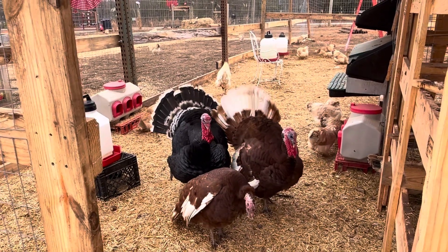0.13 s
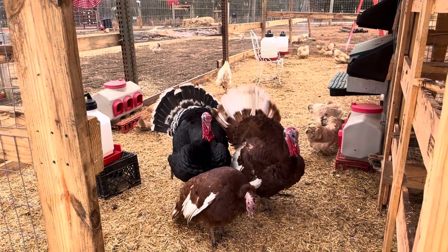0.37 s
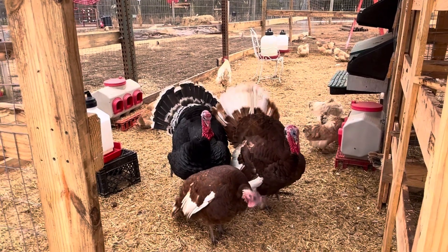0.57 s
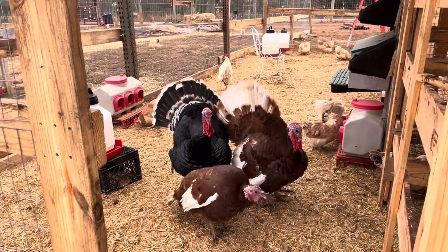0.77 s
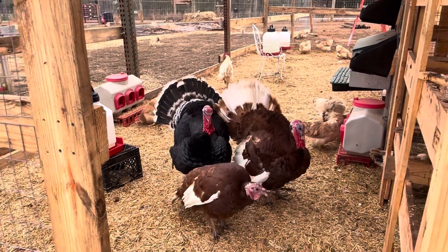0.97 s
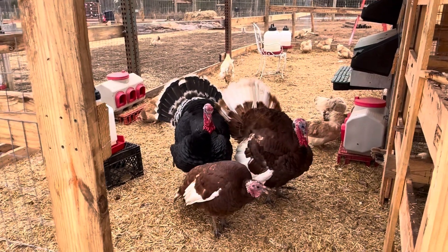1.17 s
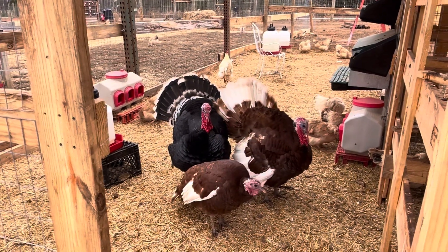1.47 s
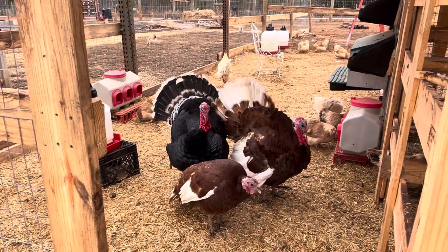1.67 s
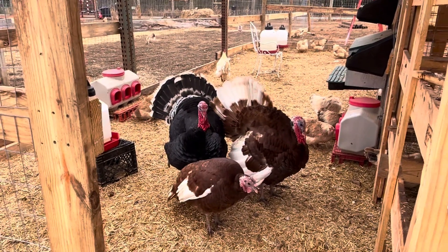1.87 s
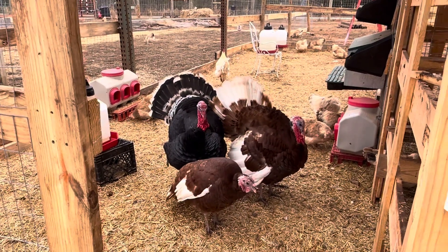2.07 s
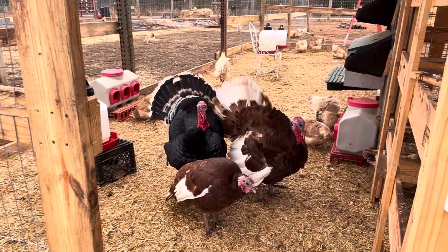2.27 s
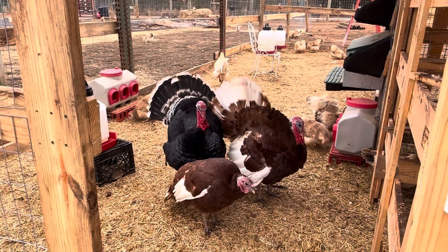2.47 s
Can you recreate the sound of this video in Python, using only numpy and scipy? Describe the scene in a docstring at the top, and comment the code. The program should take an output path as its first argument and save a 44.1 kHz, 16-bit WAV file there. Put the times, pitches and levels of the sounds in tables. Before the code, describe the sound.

Turkey feathers flutter and thump quickly, with airy puffs and rustling, over low outdoor rumble

```python
"""Wingbeats in a roofed pen

A bird beats its wings about ten times a second in a farmyard pen. Each beat thumps, ringing low hollow resonances;
air whooshes as band noise and feathers rustle as grainy bursts. Dry scratches snap in the litter, the flock stirs and
faint cheeps waver, over filtered-noise rumble and hiss. A phone with two spaced microphone ports hears it,
the left port a little later.
"""
import sys
import numpy as np
from scipy import signal
from scipy.fft import rfft, irfft
from scipy.io import wavfile
from scipy.ndimage import uniform_filter1d, map_coordinates

SR = 44100
rng = np.random.default_rng(int(sys.argv[2]) if len(sys.argv) > 2 else 0)


def gain_from_db(level_db):
    """Convert decibel levels to linear amplitude factors (20 dB per decade)."""
    decades = np.asarray(level_db, float) / 20
    return 10 ** decades


def output_pcm(signal):
    """Save a mono or channel-first signal as 16-bit PCM at the path in sys.argv[1].

    Samples are clipped to [-1, 1] before scaling.
    """
    pcm = np.clip(np.atleast_2d(signal).T, -1, 1) * 32767
    wavfile.write(sys.argv[1], SR, np.round(pcm).astype(np.int16))


N = 115101
T = np.arange(N) / SR


def col(table, k, at, log=False):
    """Column k of a table, joined by straight lines over its first column or the log of it."""
    a = np.array(table, float)
    if log:
        return np.interp(np.log(at + 1e-3), np.log(a[:, 0]), a[:, k])
    return np.interp(at, a[:, 0], a[:, k])


def unit(x):
    """Scale to rms 1."""
    return x / np.sqrt(np.mean(x ** 2))


def colour(x, points):
    """Filter by (freq_hz, gain_db) points, silent outside them."""
    hz = np.fft.rfftfreq(len(x), 1 / SR)
    inside = (hz > points[0][0]) & (hz < points[-1][0])
    gain = gain_from_db(col(points, 1, hz, log=True)) * inside
    return irfft(rfft(x) * gain, len(x))


def bell(hz, centre_hz, octaves):
    """Gaussian over log frequency, octaves being its standard deviation."""
    return np.exp(-.5 * (np.log2(hz / centre_hz) / octaves) ** 2)


def hump(x, centre_hz, octaves):
    """Bell-shaped band around centre_hz."""
    hz = np.fft.rfftfreq(len(x), 1 / SR) + 1
    return irfft(rfft(x) * bell(hz, centre_hz, octaves), len(x))


def walk(rate_hz):
    """Random levels held 1 / rate_hz seconds and smoothed twice."""
    k = int(SR / rate_hz)
    held = np.repeat(rng.standard_normal(N // k + 1), k)
    return 1.206 * uniform_filter1d(uniform_filter1d(held, k), k)[:N]


def burst(t, length_s, rise=0.35):
    """Envelope from t = 0: peaks at 1 after rise * length_s, then falls more slowly."""
    u = np.maximum(t, 0) / (rise * max(length_s, .002))
    return u * np.exp(1 - u)


def ringing(t, hz, t60_s):
    """Exponential decay of a resonance, as a complex tone falling 60 dB in t60_s."""
    return np.exp(2j * np.pi * hz * t - np.log(1000) * t / t60_s)


def crackle():
    """Noise with sparse grains of uneven size on top."""
    grains_per_s, spread_db = 3500, 2
    size = gain_from_db(spread_db * rng.exponential(size=N))
    grains = (rng.random(N) < grains_per_s / SR) * size
    return unit(grains * rng.standard_normal(N)) + 1.08 * rng.standard_normal(N)


# wing thumps: start_s, peak_db (before trim_db), centre_hz, flutter_re_push_db
WING_THUMPS = [(0.106, -52, 177, -2), (0.267, -51, 213, 0), (0.323, -40.5, 222, -10),
               (0.566, -45.5, 206, -4), (0.643, -38.5, 260, -7.5), (0.699, -57.5, 296, -10),
               (0.777, -35.5, 286, -6.5), (0.861, -40, 237, 2), (0.871, -46, 234, -16),
               (0.944, -42, 289, 3), (0.957, -42.5, 242, 3), (0.989, -37, 205, -26), (1.057, -34, 226, -3),
               (1.095, -55, 256, -6), (1.135, -43, 219, 0), (1.167, -34.5, 298, -2.5),
               (1.278, -33.5, 202, -3), (1.347, -40.5, 326, -4), (1.385, -36.5, 248, 0),
               (1.409, -43, 236, 11), (1.472, -41, 331, 2), (1.488, -38.5, 238, -3),
               (1.554, -47.5, 324, -4), (1.598, -40.5, 335, -6), (1.619, -47, 332, -18),
               (1.707, -43.5, 221, 5.5), (1.733, -48, 189, -18), (1.775, -42.5, 220, -2),
               (1.799, -41.5, 408, 2), (1.998, -49, 128, -4), (2.027, -42.5, 282, 3.5),
               (2.128, -36.5, 304, -2.5), (2.3, -45, 202, -3.5), (2.335, -42.5, 199, -12),
               (2.404, -44, 172, -2)]
# hollow resonances: freq_hz, level_db, t60_s
HOLLOW_MODES = [(117, -3, 0.054), (142.5, -4, 0.037), (205, -2.5, 0.081), (250, 1, 0.029),
                (317.7, -7, 0.12), (426, -8.5, 0.068), (529.4, -16.5, 0.12)]


def thumps():
    """A soft push of air, then flutter, ring the hollow resonances."""
    push_s, flutter_s, flutter_octaves, trim_db = 0.0035, 0.032, 0.68, -1
    size = 16384
    out, t = np.zeros(N + size), np.arange(size) / SR
    ring = sum(gain_from_db(db) * ringing(t, hz, t60_s).real for hz, db, t60_s in HOLLOW_MODES)
    airs = rng.standard_normal((len(WING_THUMPS), size))
    for (start_s, db, hz, flutter_db), air in zip(WING_THUMPS, airs):
        push = burst(t, push_s, rise=0.77) * np.sin(2 * np.pi * hz * t)
        flutter = hump(air, hz, flutter_octaves) * burst(t, flutter_s)
        drive = unit(push) + gain_from_db(flutter_db) * unit(flutter)
        thump = signal.fftconvolve(drive, ring)[:size]
        i = int(start_s * SR)
        out[i:i + size] += thump / np.abs(thump).max() * gain_from_db(db + trim_db)
    return out[:N]


# air through the wing: start_s, level_db (before trim_db), centre_hz, length_s
WING_WHOOSHES = [(0.107, -55, 597, 0.023), (0.539, -54.5, 740, 0.045), (0.574, -53, 604, 0.017),
                 (0.648, -61, 613, 0.021), (0.78, -51, 566, 0.013), (0.783, -56, 1580, 0.02),
                 (0.85, -48, 850, 0.018), (0.871, -48.5, 710, 0.021), (0.977, -52, 844, 0.031),
                 (1.003, -48, 590, 0.018), (1.068, -50.5, 930, 0.0092), (1.15, -47, 570, 0.028),
                 (1.172, -51.5, 565, 0.02), (1.28, -54, 685, 0.025), (1.334, -48.5, 920, 0.034),
                 (1.391, -57, 940, 0.046), (1.474, -52, 603, 0.021), (1.554, -49.5, 1040, 0.015),
                 (1.619, -57.5, 740, 0.029), (1.729, -53.5, 850, 0.027), (1.788, -51, 920, 0.026),
                 (1.873, -57, 610, 0.045), (1.974, -59.5, 550, 0.05), (2.018, -50.5, 875, 0.012),
                 (2.071, -54, 940, 0.038), (2.131, -54.5, 650, 0.032), (2.167, -53.5, 895, 0.022),
                 (2.447, -57.5, 596, 0.034), (2.597, -49, 520, 0.025)]


def whooshes():
    """Air through the wing: short puffs of band noise."""
    width_octaves, trim_db = 0.56, -7
    size = 8192
    out, t = np.zeros(N + size), np.arange(size) / SR
    airs = rng.standard_normal((len(WING_WHOOSHES), size))
    for (start_s, db, hz, length_s), air in zip(WING_WHOOSHES, airs):
        puff = unit(hump(air, hz, width_octaves)) * burst(t, length_s, rise=0.62) ** 2
        i = int(start_s * SR)
        out[i:i + size] += puff * gain_from_db(db + trim_db)
    return out[:N]


# feather rustles: time_s, level_db (low band before low_trim_db), top_re_level_db, length_s
FEATHER_RUSTLES = [(0.073, -78.5, 4.5, 0.061), (0.123, -56.5, -13, 0.047), (0.333, -63, -10, 0.055),
                   (0.427, -68, -10, 0.058), (0.488, -62, -12, 0.04), (0.52, -66, -24, 0.05),
                   (0.568, -64, -27, 0.047), (0.628, -58.5, -18.5, 0.074), (0.675, -63.5, -14.5, 0.084),
                   (0.72, -66, -12.5, 0.067), (0.782, -51.5, -17.5, 0.056), (0.892, -60, -34, 0.022),
                   (0.974, -54.5, -9, 0.043), (1.017, -62, -27, 0.062), (1.08, -54, -14.5, 0.049),
                   (1.16, -62, -26, 0.033), (1.274, -54, -14, 0.07), (1.31, -58.5, -21, 0.052),
                   (1.398, -54.5, -16, 0.054), (1.433, -57, -19.5, 0.057), (1.4994, -59.5, -16, 0.046),
                   (1.62, -52.5, -13.5, 0.057), (1.716, -57, -17, 0.069), (1.79, -61.5, -15, 0.051),
                   (1.863, -68, -25, 0.036), (1.911, -58.5, -16.5, 0.07), (2.037, -62, -14, 0.045),
                   (2.135, -56, -17, 0.07), (2.272, -57, -15.5, 0.047), (2.502, -75, 0.5, 0.1)]
# low band spectrum: freq_hz, density_db (per Hz)
RUSTLE_LOW = [(1200, 3.5), (2000, -2), (3400, -0.5), (5000, -1.5), (7000, -2)]
# top band spectrum: freq_hz, density_db (per Hz)
RUSTLE_HIGH = [(7000, -4), (9000, -3), (12000, -3.5), (14000, -7), (15000, -11), (16000, -27)]


def rustles():
    """Feathers rub in grainy bursts, each with its own brightness; the top band starts 3 ms sooner."""
    low_trim_db = -9.5
    low, top = np.zeros(N), np.zeros(N)
    for time_s, db, top_db, length_s in FEATHER_RUSTLES:
        low += gain_from_db(db + low_trim_db) * burst(T - time_s + 0.01, length_s)
        top += gain_from_db(db + top_db) * burst(T - time_s + 0.013, length_s)
    grain = crackle()
    return low * unit(colour(grain, RUSTLE_LOW)) + top * unit(colour(grain, RUSTLE_HIGH))


# dry scratches in the litter: start_s, level_db, decay_s (to 1/e), centre_hz, width_octaves
LITTER_SCRATCHES = [(2.179, -50.5, 0.0031, 2780, .4), (2.1823, -52, 0.0018, 4970, 0.58),
                    (2.186, -54, 0.0084, 4000, 0.58), (2.2, -59, 0.006, 4200, 0.64),
                    (2.212, -61, 0.0064, 3700, .3), (2.218, -61, 0.0089, 4050, 0.33),
                    (2.383, -59, 0.008, 4500, 0.62)]
# stiff quills and straw: freq_hz, level_db
QUILL_MODES = [(1900, 7), (2520, -0.5), (3000, -4), (3394, -6), (3960, -5), (4974, -18), (5378, -9),
               (5905, -2)]


def scratches():
    """Sudden dry snaps of noise die away and briefly ring stiff quills and straw."""
    quill_re_snaps_db, quill_t60_s = -1, .018
    grain, t = crackle(), T[:4096]
    ring = sum(gain_from_db(db) * ringing(t, hz, quill_t60_s).imag for hz, db in QUILL_MODES)
    snaps = np.zeros(N)
    for start_s, db, decay_s, hz, octaves in LITTER_SCRATCHES:
        decay = (T > start_s) * np.exp(-np.maximum(T - start_s, 0) / decay_s)
        snaps += gain_from_db(db) * decay * unit(hump(grain, hz, octaves))
    rung = signal.fftconvolve(snaps, ring)[:N]
    return snaps + gain_from_db(quill_re_snaps_db) * np.std(snaps) * unit(rung)


# flock, before trim_db and flicker: time_s, low_db (150-500 Hz), mid_db (0.6-2.4 kHz), treble_db, bass_db (90-170 Hz)
FLOCK_STIR = [(0.0, -60.5, -77, -81, -54), (0.12, -66.5, -74, -86, -55), (0.3, -68, -69.5, -70.5, -54),
              (0.42, -68, -69, -74.5, -62), (0.52, -61, -70.5, -72.5, -64), (0.69, -61.5, -69, -68, -60),
              (0.76, -60.5, -70, -70, -49.5), (0.97, -57.5, -64.5, -65.5, -60.5),
              (1.32, -60.5, -63, -67, -48), (1.53, -57.5, -63.5, -69, -54.5), (1.6, -56.5, -61, -69, -54.5),
              (1.94, -57, -60, -69, -57), (2.25, -54.5, -66, -67, -55), (2.43, -61, -64, -72.5, -57),
              (2.61, -64, -65.5, -83, -69)]
# treble spectrum: freq_hz, density_db (per Hz)
FLOCK_TREBLE = [(2200, 1.5), (3000, 1.5), (5200, 2), (7500, -4), (12000, -7), (14500, -11.5), (16000, -11)]


def stir(flicker):
    """Continuous shuffling of the flock: four noise bands whose levels drift and flicker."""
    trim_db, flicker_db = -2, 1.5
    noise = rng.standard_normal(N)
    bands = [hump(noise, 271.0, 0.68), hump(noise, 1126.0, 0.71),
             colour(crackle(), FLOCK_TREBLE), hump(noise, 111.0, 0.38)]
    out = np.zeros(N)
    for k, band in enumerate(bands):
        level_db = col(FLOCK_STIR, k + 1, T) + trim_db + flicker_db * flicker[k]
        out += unit(band) * gain_from_db(level_db)
    return out


# faint far cheeps: start_s, level_db, start_hz, end_hz, length_s
FAR_CHEEPS = [(0.09, -79, 3490, 3570, 0.056), (0.117, -67.5, 3520, 3760, 0.044),
              (0.178, -75, 3480, 3650, 0.04), (0.26, -79, 3500, 3550, 0.031),
              (0.357, -79.5, 3500, 3520, 0.16)]


def cheeps():
    """Gliding, wavering near-sines with a breathy halo of band noise."""
    waver_ratio, breath_re_tone_db, breath_octaves = .03, -2.5, .16
    waver, breath = 1 + waver_ratio * walk(900), rng.standard_normal(N)
    out = np.zeros(N)
    for start_s, db, start_hz, end_hz, length_s in FAR_CHEEPS:
        pitch_hz = np.interp(T, [start_s, start_s + length_s], [start_hz, end_hz]) * waver
        tone = np.sin(2 * np.pi * np.cumsum(pitch_hz) / SR)
        halo = gain_from_db(breath_re_tone_db) * unit(hump(breath, end_hz, breath_octaves))
        out += gain_from_db(db) * burst(T - start_s, length_s) * (tone + halo)
    return out


# rumble and hiss spectrum: freq_hz, density_db (per Hz)
YARD_SPECTRUM = [(15, -43), (28, -18), (40, -10), (55, 3), (70, 0), (88, 2.5), (115, -1), (150, -7.5),
                 (244, -13), (320, -15), (439, -30), (771, -38.5), (1610, -27), (2300, -33), (2700, -42),
                 (3790, -46), (7000, -40)]


def yard(flicker):
    """Distant rumble and hiss: coloured noise with a slightly flickering level."""
    level_db, flicker_db = -52.5, 0.5
    noise = unit(colour(rng.standard_normal(N), YARD_SPECTRUM))
    return noise * gain_from_db(level_db + flicker_db * flicker)


def patchy(x, spots):
    """Spots of pitch and time swell and fade above 400 Hz: a smooth random field weights the spectrum."""
    depth_db, patch_hz, patch_s = 2.2, 100, .03
    hz, t, z = signal.stft(x, SR, nperseg=1024)
    where = np.meshgrid(hz / patch_hz, t / patch_s, indexing="ij")
    field = map_coordinates(spots, where)
    weight = gain_from_db(depth_db * field * (hz[:, None] > 400))
    return signal.istft(z * weight, SR, nperseg=1024)[1][:N]


# broad pen resonances: freq_hz, width_octaves (at least 0.02 is used), gain_db
PEN_MODES = [(926, 0.065, 4.5), (1187, 0.025, 2), (1543, 0.017, -3), (3403, 0.017, 5.5), (5030, 0.05, 0.5)]


def pen_gain(hz):
    """The pen's resonances lift or dip bands of every sound."""
    return gain_from_db(sum(db * bell(hz + 1, f, max(octaves, .02)) for f, octaves, db in PEN_MODES))


# microphone ports: freq_hz, left_lead_rad, direct_power_share (0-1), left_re_right_db
MIC_PORTS = [(0, 2, 1, 4), (63, 0.03, 0.94, -1.5), (129, 0.22, 0.89, -2.5), (288, -0.73, 0.67, -2.5),
             (550, -1.16, 0.57, -2.5), (760, -3, 0.34, -4), (1820, -2, 0.13, 2), (2720, -5.5, 0.089, -3.5),
             (3980, -3.5, 0.12, 0.5), (6440, -7.5, 0.25, 3.5), (7420, -9, 0.86, -6.5),
             (7900, -9.5, 0.95, 2), (9130, -9.5, 0.98, 5), (10040, -11.5, 0.75, -5), (11100, -12, 0.98, 5),
             (13240, -13.5, 0.94, -4), (14200, -15, 0.9, 1), (15000, -15.5, 0.93, 7),
             (22500, -12, 0.71, -19)]


def scene():
    """Direct sound reaches the two ports with a phase lag; scattered sound is unrelated at each."""
    shared = walk(8.98)
    flicker = [0.69 * shared + 0.94 * walk(14) for _ in range(5)]
    spots = rng.standard_normal((224, 180))

    def noisy():
        """A fresh draw of all sounds but the thumps."""
        textured = whooshes() + rustles() + stir(flicker) + yard(flicker[4])
        return patchy(textured, spots) + scratches() + cheeps()

    hz = np.fft.rfftfreq(N, 1 / SR)
    share = np.clip(col(MIC_PORTS, 2, hz), 0, 1)
    lead_rad, tilt_db = col(MIC_PORTS, 1, hz), col(MIC_PORTS, 3, hz)
    direct = rfft(thumps(), N) + np.sqrt(share) * rfft(noisy(), N)
    pen = pen_gain(hz)
    out = []
    for side in (.5, -.5):  # left, right
        scattered = np.sqrt(1 - share) * rfft(noisy(), N)
        port = direct * np.exp(1j * side * lead_rad) + scattered
        out.append(irfft(port * pen * gain_from_db(side * tilt_db), N)[:N])
    return np.array(out)


def top_cut(x):
    """Nothing passes above the cut-off."""
    return signal.sosfilt(signal.butter(12, 15700, fs=SR, output="sos"), x)


def record(dry):
    """The two-port mix as the phone delivers it."""
    return top_cut(dry)


dry = scene()
out = record(dry)
output_pcm(out)
```